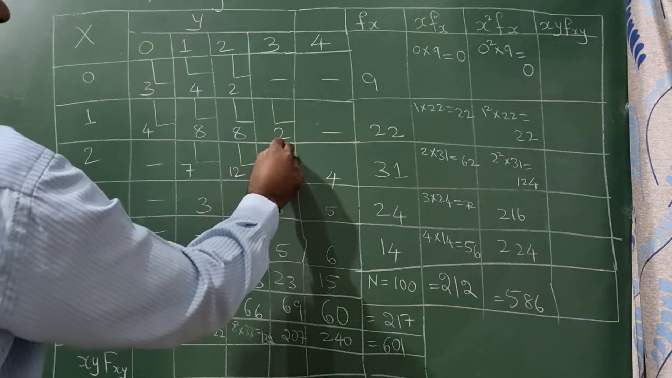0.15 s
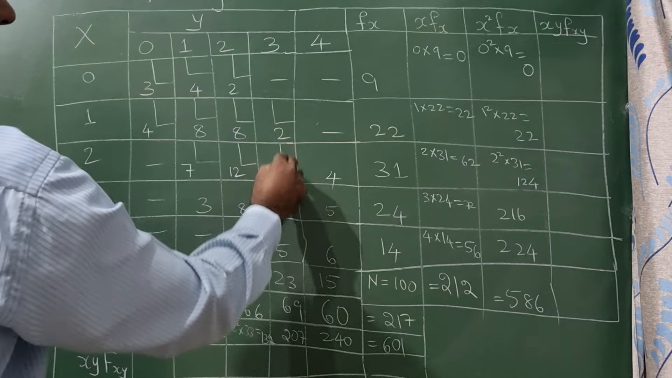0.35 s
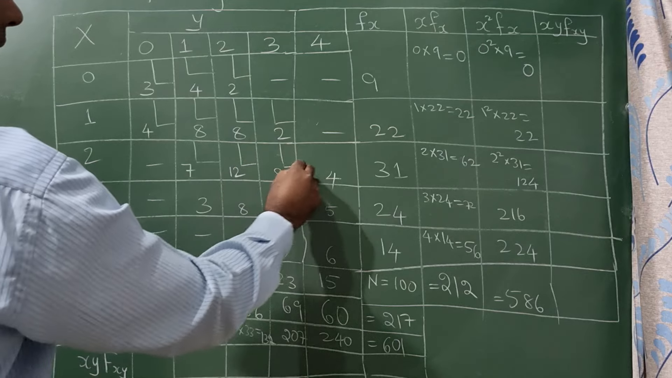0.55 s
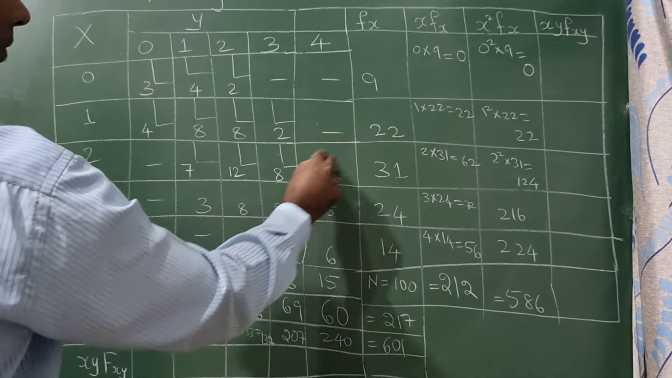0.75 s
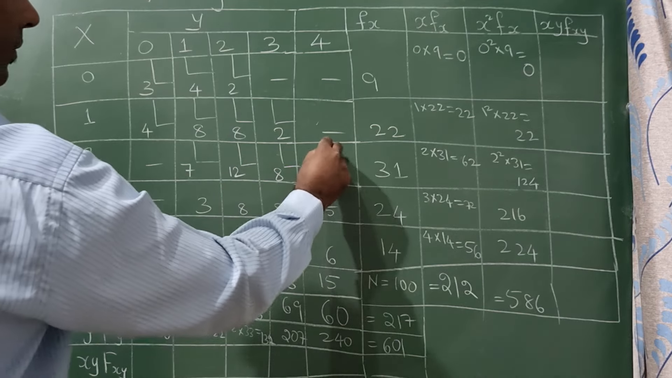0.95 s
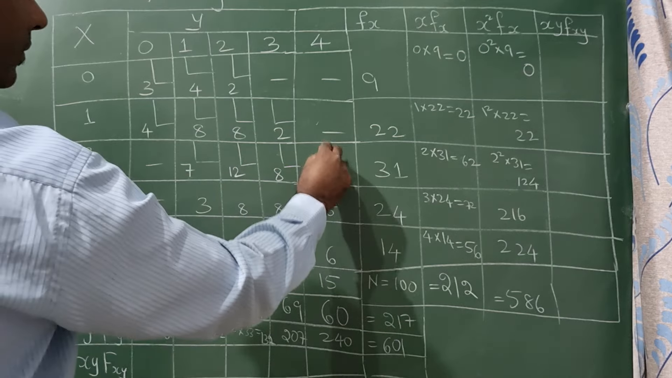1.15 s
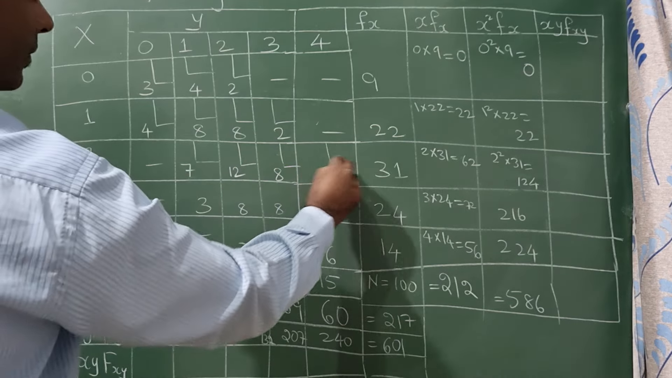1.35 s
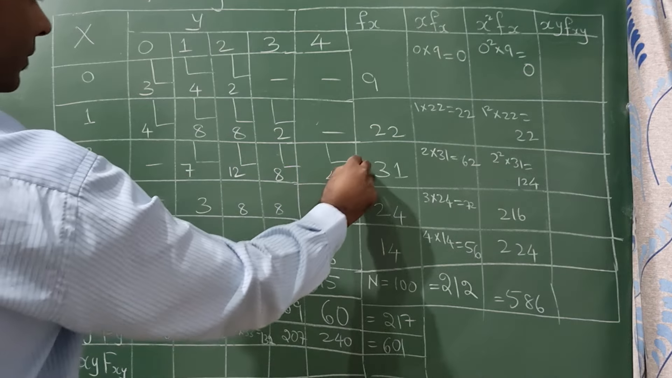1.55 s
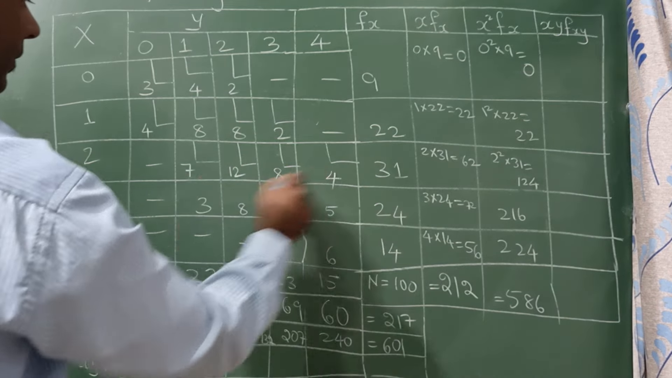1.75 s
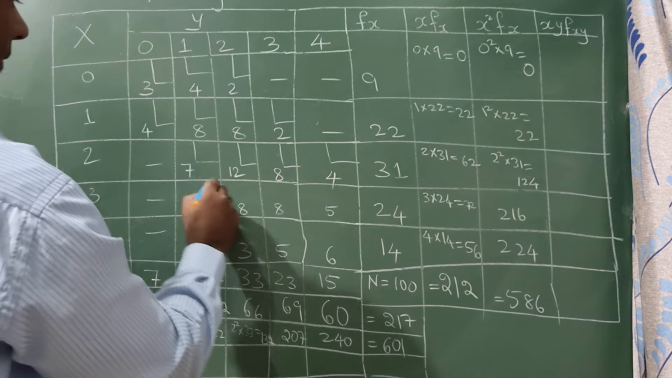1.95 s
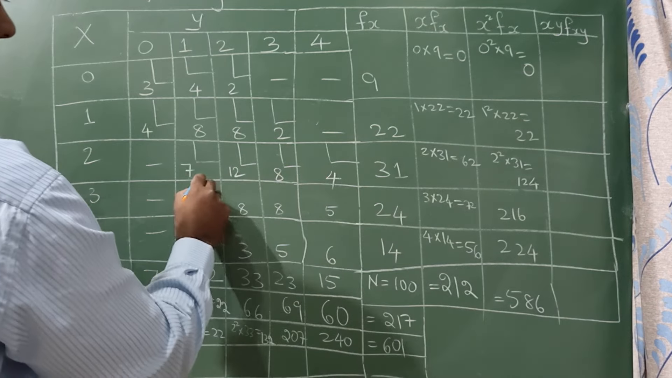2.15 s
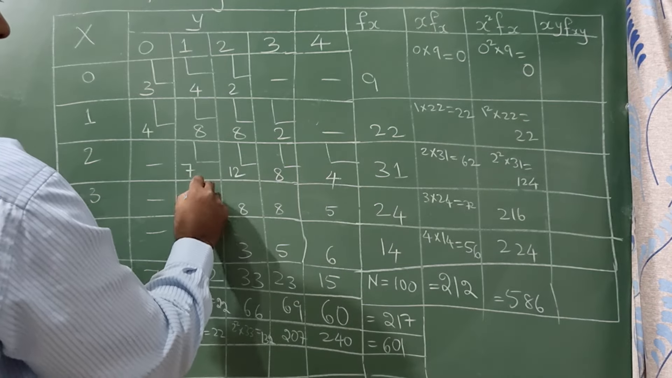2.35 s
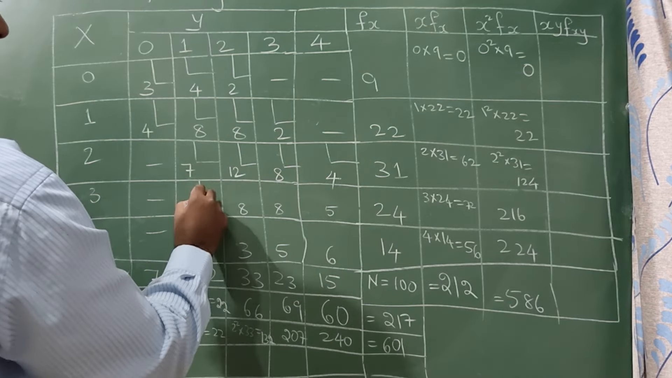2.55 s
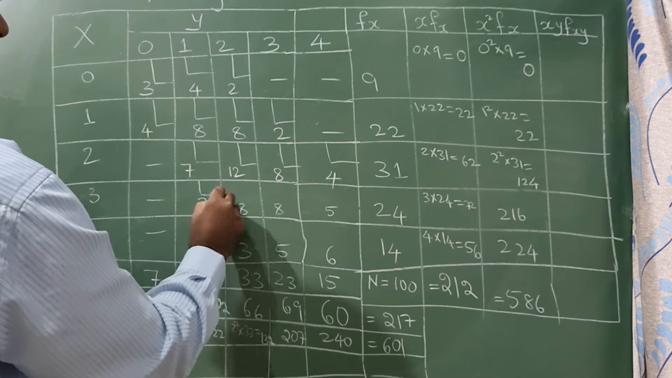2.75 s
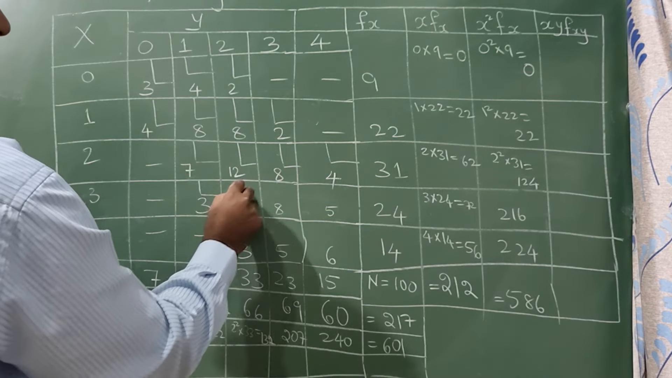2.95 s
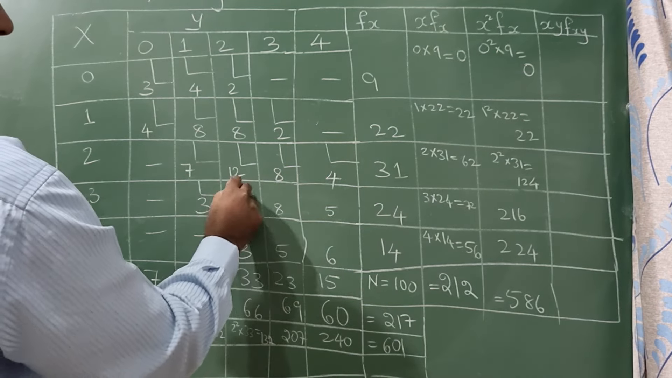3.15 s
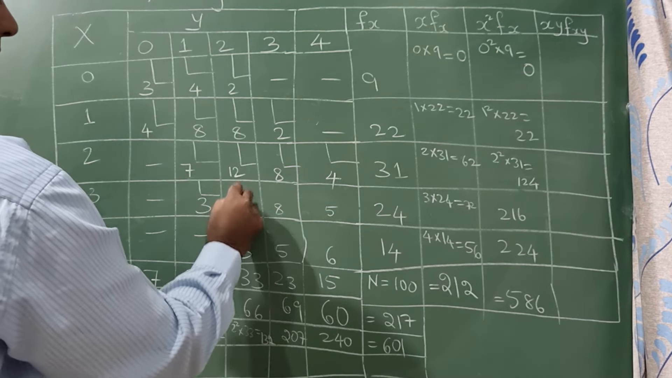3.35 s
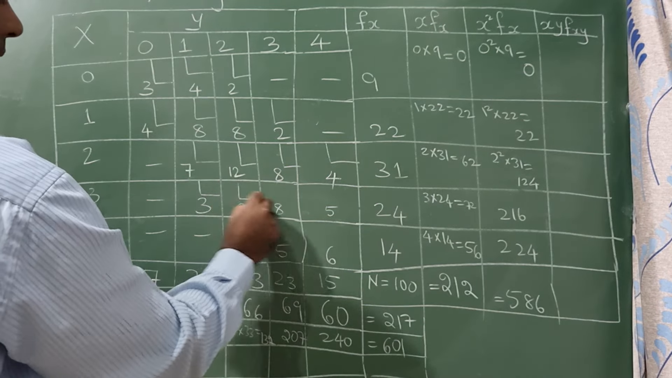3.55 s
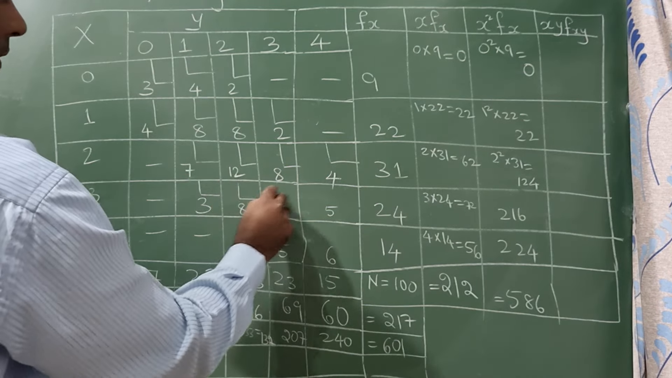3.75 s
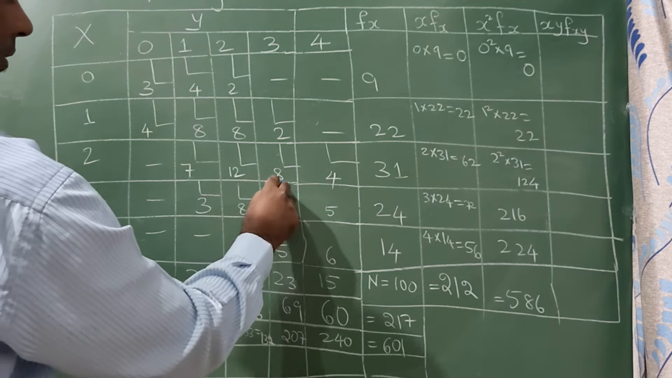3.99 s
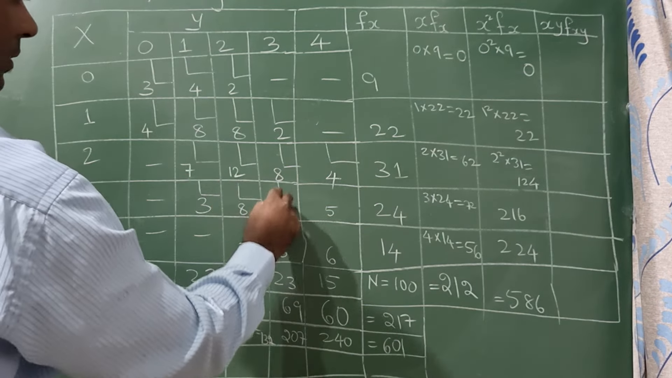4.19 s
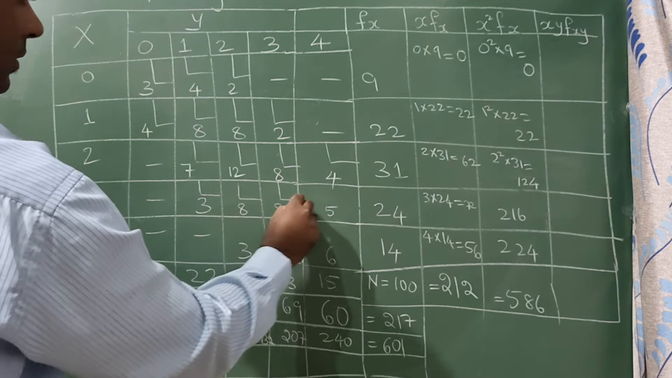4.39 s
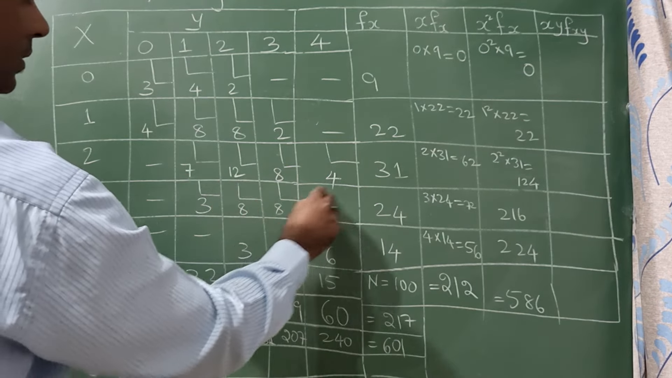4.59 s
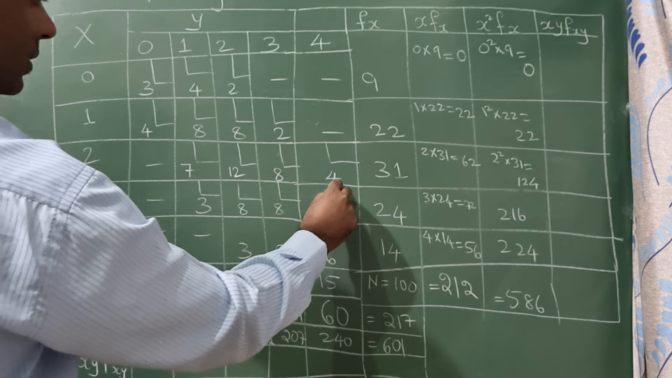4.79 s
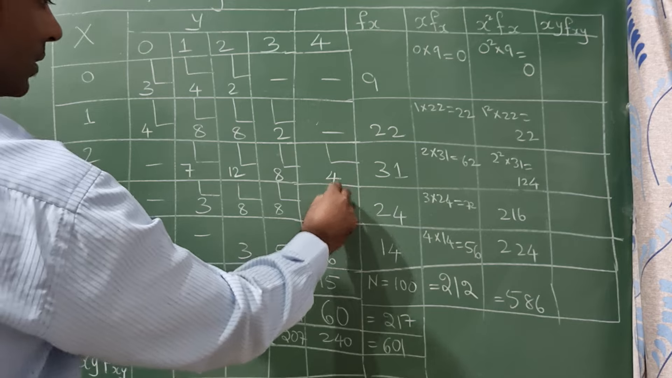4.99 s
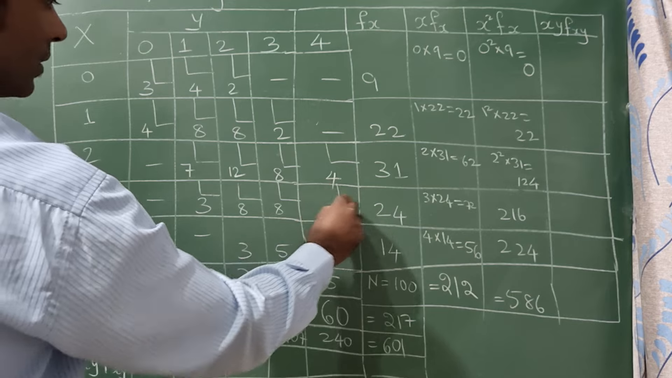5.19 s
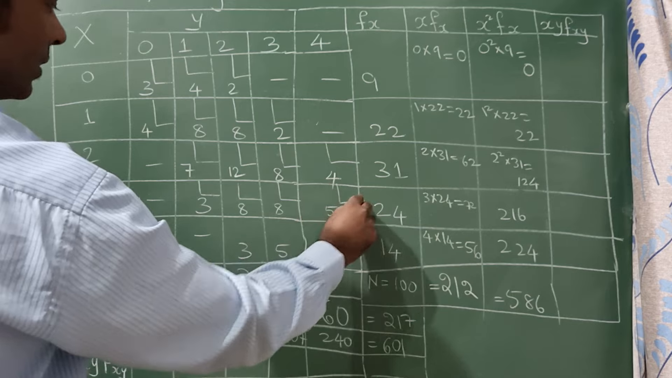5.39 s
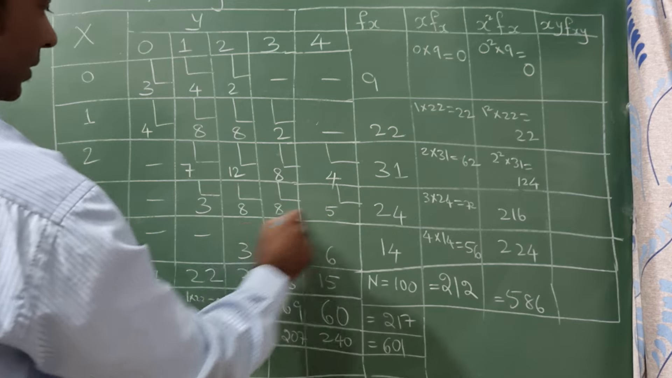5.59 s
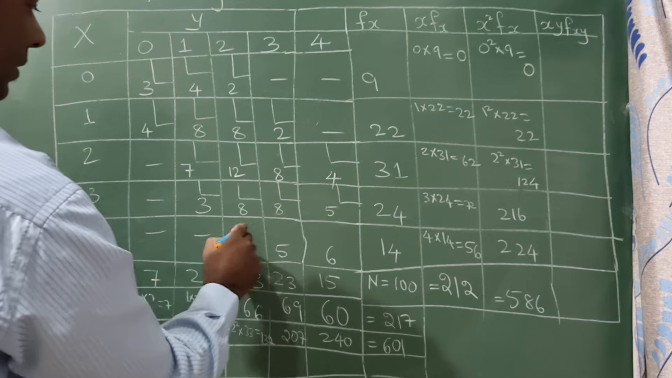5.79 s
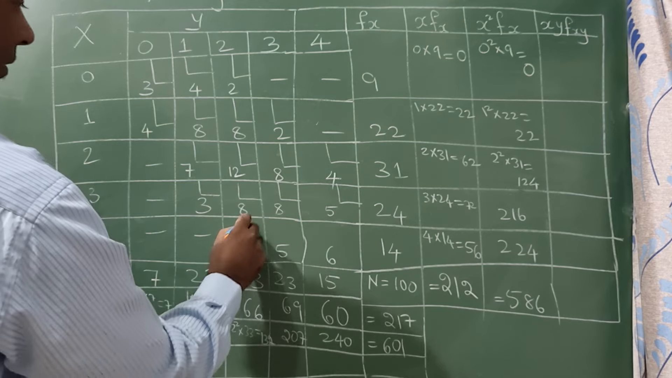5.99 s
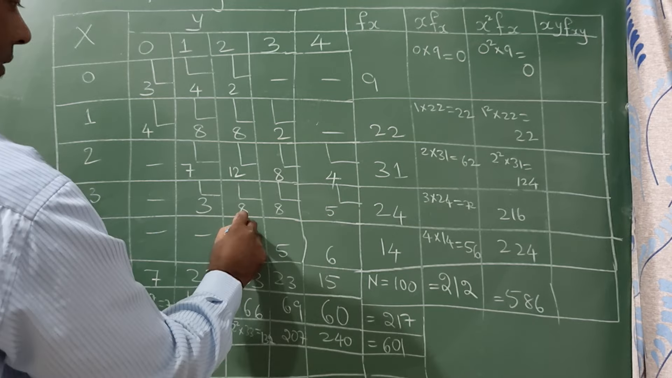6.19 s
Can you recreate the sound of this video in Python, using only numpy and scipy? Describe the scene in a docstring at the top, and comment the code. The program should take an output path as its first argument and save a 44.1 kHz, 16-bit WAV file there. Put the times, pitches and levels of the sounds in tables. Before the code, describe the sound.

A stick of chalk lands on a wall-mounted board six times, roughly once a second, each with a hollow, woody knock and a short room tail. After every knock come two brief dry strokes, the second raspier. A sleeve brushes faintly between marks as the arm moves. A distant clock ticks weakly above steady low hum and soft microphone hiss. The microphone stands in the same small, hard room.

```python
"""A small hard room with a wall-mounted board: chalk lands six times with a hollow knock,
each time followed by a down stroke and a side stroke. Knocks are fading tones of the board plus noise
for the room; strokes are filtered noise that swells as the chalk moves, with rasps, whistles and clicks.
A sleeve brushes, a far clock ticks, and steady room hum and microphone hiss lie below."""
import sys
import numpy as np
from scipy import signal
from scipy.fft import rfft, irfft, next_fast_len
from scipy.io import wavfile
from scipy.ndimage import map_coordinates

SR = 44100
rng = np.random.default_rng(int(sys.argv[2]) if len(sys.argv) > 2 else 0)


def boost(x):
    """Linear amplitude factor 10**(x/20) for a level x in decibels (scalar or array-like)."""
    u = np.asarray(x, float) / 20
    return 10 ** u


def put_to_file(sound):
    """Save the sound as 16-bit audio at rate SR, in the file named by the first command-line argument."""
    columns = np.atleast_2d(sound).T  # one column per channel
    safe = np.clip(columns, -1, 1)
    whole_steps = np.round(safe * 32767)
    wavfile.write(sys.argv[1], SR, whole_steps.astype(np.int16))


N = 274743  # length in samples

# colour of room hum and hiss: (frequency [Hz], relative level [dB])
AIR_COLOUR = [(15, -54), (25, -23.5), (38, -10), (59, -0.5), (123, -5), (190, -8), (270, -14.5), (354, -16),
              (575, -17.5), (641, -13.5), (714, -20), (1040, -22), (2000, -29), (14000, -33.5),
              (16000, -36)]
AIR_DB = -48.5  # usual level of hum and hiss together
HUM_WAVER_DB, HUM_WAVERS_PER_S = 0.7, 2.4  # full size at the lowest pitches only

# colour of the clock's tick: (frequency [Hz], relative level [dB])
CLOCK_COLOUR = [(500, -16), (1000, 4), (1800, -2.5), (2700, -1), (4500, -3), (6000, -13), (10000, -35)]
CLOCK_FIRST_S, CLOCK_PERIOD_S = 0.075, 1.0005
CLOCK_DB, CLOCK_WEAK_DB = -50.5, -6  # every other tick is weaker
CLOCK_T60_S, CLOCK_RISE_S = 0.63, 0.0053  # T60: the time to fall by 60 dB

# chalk landings: (time [s], level [dB], tick level against the knock before a shared lift [dB])
LANDINGS = [(0.284, -3, -39), (1.154, -10.5, -23.5), (2.381, -3.5, -41), (3.286, -5, -41),
            (4.13, -2.5, -34), (4.99, -8, -40.5)]
# pitches at which the board rings: (frequency [Hz])
BOARD_HZ = [178, 240, 281, 330, 376, 488, 540, 645, 672, 765, 812, 856, 922, 995, 1110, 1250, 1335, 1410,
            1515, 1620, 1790, 1845, 1945]
# how each pitch rings before a landing colours and shortens it: (level [dB], T60 [s])
BOARD_RING = [(8.5, 0.11), (-13.5, 0.87), (-5, 0.25), (9, 0.3), (5.5, 0.38), (-1, 0.14), (-6.5, 0.4),
              (-4, 0.19), (-4, 0.48), (-14.5, .3), (1.5, 0.49), (-3.5, 0.14), (11, 0.37), (-0.5, 0.45),
              (-8, 0.16), (-5, 0.2), (-13, 0.12), (-6, 0.5), (10.5, 0.26), (6.5, 0.24), (5, 0.41),
              (4, 0.17), (-9, 0.68)]
# colour of the knock at each landing spot, in order: (frequency [Hz], relative level [dB])
SPOT_1 = [(88, -53), (150, -23), (273, -8.5), (324, -27), (371, -0.5), (430, -15.5), (530, -3), (793, -0.5),
          (1480, -12.5), (1950, -20.5), (2200, -32.5), (2800, -35), (3640, -66), (6160, -120)]
SPOT_2 = [(88, -55), (150, -16.5), (230, -24), (358, -8), (425, -24), (536, 0), (813, -7), (989, -15.5),
          (1360, -7), (1900, -19.5), (2150, -32), (2800, -42), (3640, -68), (6160, -120)]
SPOT_3 = [(88, -40), (150, -16.5), (298, -19.5), (380, -5.5), (425, -5), (629, 0), (1040, -17.5),
          (1310, -9), (1600, -19), (2050, -24.5), (2300, -42), (2800, -42), (3640, -77), (6160, -120)]
SPOT_4 = [(88, -52), (150, -19), (305, -12.5), (380, -1), (425, -11), (480, -2), (784, -3.5), (1160, -15.5),
          (1500, -13.5), (1950, -25), (2200, -36), (2800, -36), (3640, -77), (6160, -120)]
SPOT_5 = [(88, -52), (150, -20.5), (277, -9.5), (313, -22), (376, 1.5), (425, -10), (474, -1.5), (719, -2),
          (900, -3), (1200, -10), (1950, -22), (2080, -33), (2800, -35), (3640, -68), (6160, -120)]
SPOT_6 = [(88, -40), (150, -6), (239, -26.5), (332, -11), (425, -9.5), (652, 0.5), (908, -1.5),
          (1650, -14.5), (2190, -33), (2800, -43), (3640, -73), (6160, -120)]
# the nearest wall sends a knock back: (delay [s], level [dB])
WALL_ECHOES = [(.0082, -11)]
# how the room's noise dies before a sound's own fade shortens it: (frequency [Hz], T60 [s])
ROOM_T60 = [(150, 1), (400, 0.57), (1000, 0.5), (2000, 0.48), (5000, 0.49), (14000, .2)]
# colour of the chalk tip on slate: (frequency [Hz], relative level [dB])
TIP_COLOUR = [(1500, -15), (2500, 3), (3600, 7), (4500, -3.5), (7000, -12.5), (15000, -16)]
CLICK_HZ = 4280  # the stick's own click as it lands

# strokes: (fastest moment [s], length [s], fine hiss level [dB], coarse hiss level [dB])
STROKES = [(.42, 0.15, -50.5, -50), (.63, 0.11, -51, -49.5), (1.3, 0.13, -51, -49.5),
           (1.52, .13, -44, -44.5), (2.52, 0.28, -53, -56.5), (2.79, 0.16, -51, -56.5),
           (3.45, 0.17, -50, -54.5), (3.64, .13, -48, -51), (4.26, .17, -50.5, -50.5),
           (4.455, 0.11, -49, -52.5), (5.13, 0.21, -53.5, -54), (5.335, .11, -46.5, -47.5)]
# sleeve brushes as the arm swings back: (middle [s], length [s], fine hiss level [dB], coarse hiss level [dB])
SLEEVE_SWINGS = [(1.864, 0.67, -56.5, -57), (3.0, 0.11, -59, -60), (3.89, 0.26, -62, -60),
                 (4.703, .2, -65, -67), (5.713, 0.61, -58, -57.5)]
STROKE_SHARPNESS, STROKE_TAIL = 1.37, 0.98  # how pointed the swell is; fall time over rise time
# colour of the fine hiss: (frequency [Hz], relative level [dB])
FINE_COLOUR = [(4710, -35), (8000, -10.5), (9690, -7), (11100, -4.5), (13000, -2.5), (14100, -0.5),
               (16000, -8)]
# colour of the coarse hiss: (frequency [Hz], relative level [dB])
COARSE_COLOUR = [(2000, 3), (2800, 1.5), (4000, 2), (5000, 0.5), (6300, 2.5), (8000, -7), (10000, -16.5)]

# the rubbed stick sings: (middle [s], length [s], centre [Hz], half width [Hz], level [dB])
WHISTLES = [(.41, 0.12, 5970, 400, -61), (0.618, .06, 11300, 400, -56), (0.639, 0.036, 1700, 80, -46.5),
            (1.3, 0.13, 6500, 500, -56), (0.397, .07, 3680, 200, -57), (1.19, 0.064, 3000, 600, -57),
            (1.287, 0.072, 4020, 250, -54.5), (1.52, 0.047, 1304, 60, -38.5), (1.52, 0.045, 1850, 70, -39),
            (1.517, .08, 14400, 600, -54), (1.516, .08, 6500, 500, -57), (2.52, .12, 12040, 250, -58.5),
            (2.777, 0.11, 14200, 600, -49), (3.449, 0.06, 11300, 600, -49),
            (3.648, 0.089, 11150, 250, -50.5), (4.266, 0.12, 11900, 500, -55),
            (4.449, 0.076, 11400, 450, -49), (4.483, 0.038, 1300, 250, -43), (5.13, 0.077, 6250, 300, -61),
            (5.325, 0.078, 1195, 100, -41), (5.346, .06, 11100, 400, -53)]

# side strokes dragging: (time of full pressure [s], rise [s], rasp level [dB], centre [Hz])
DRAGS = [(.625, .05, -42, 1040), (1.53, 0.073, -43.5, 1370), (2.77, 0.053, -47.5, 960),
         (3.635, 0.036, -41, 1000), (4.46, 0.041, -39, 1030), (5.335, 0.039, -37.5, 1160)]
DRAG_T60_S, DRAG_SHARPNESS = 0.47, 1.66  # the rasp dies with the board; how pointed its rise is

# the chalk catches and snaps free: (time [s], level [dB])
SLIPS = [(1.546, -16.5)]
# tones heard at a slip: (frequency [Hz], level [dB], T60 [s])
SLIP_RING = [(923, -21, 0.21), (1340, -11, 0.21), (1793, 4.5, 0.058), (2300, -9, 0.091), (2600, -22, 0.12)]
# crumbs cracking off: (time [s], level [dB], pitch [Hz])
CRUMBS = [(3.8607, -31.5, 9950), (5.551, -36, 13400)]

TOP_HZ = 15830  # nothing above this is let through


def unit(x):
    """Scales a sound to an average (rms) size of 1."""
    return x / np.sqrt(np.mean(x ** 2) + 1e-20)


def along(points, hz):
    """Reads a value between (Hz, value) points, with frequency on a log axis."""
    f, v = np.transpose(points)
    return np.interp(np.log(hz + 1), np.log(f + 1), v)


def wobble(rate):
    """Draws a smooth random curve with this many knots a second."""
    knots = rng.standard_normal(int(N * rate / SR) + 4)
    return map_coordinates(knots, [np.arange(N) * rate / SR])


def shaped(x, gain):
    """Changes a sound's spectrum over time by gain(Hz, s)."""
    hz, t, z = signal.stft(x, SR, nperseg=512)
    return signal.istft(z * gain(hz[:, None], t), SR, nperseg=512)[1][:len(x)]


def coloured(x, spectrum):
    """Filters a sound through (Hz, dB) points and scales it to rms 1."""
    m = next_fast_len(len(x) + 8192)
    gain = boost(along(spectrum, np.fft.rfftfreq(m, 1 / SR)))
    return unit(irfft(rfft(x, m) * gain, m)[:len(x)])


def add(track, s, sound):
    """Mixes a sound in at time s."""
    track[round(s * SR):][:len(sound)] += sound


def air():
    """Room hum and microphone hiss are steady noise; the hum wavers more than the hiss."""
    hum_db = HUM_WAVER_DB * wobble(HUM_WAVERS_PER_S)

    def waver(hz, t):
        return boost(np.interp(t * SR, np.arange(N), hum_db) / (1 + (hz / 250) ** 2))

    steady = coloured(rng.standard_normal(N), AIR_COLOUR)
    return boost(AIR_DB + 0.73 * wobble(2.22)) * shaped(steady, waver)


def clock():
    """Faint ticks of a far wall clock are fading noise, heard almost only through the room."""
    out, t = np.zeros(N + 2 * SR), np.arange(SR // 2) / SR
    blur = boost(-60 * t / CLOCK_T60_S) * (1 - np.exp(-t / CLOCK_RISE_S))
    for k in range(7):
        tick = coloured(rng.standard_normal(len(t)), CLOCK_COLOUR) * blur
        level_db = CLOCK_DB + CLOCK_WEAK_DB * (k % 2)
        add(out, CLOCK_FIRST_S + k * CLOCK_PERIOD_S, boost(level_db) * tick)
    return out[:N]


def board():
    """Joins the board's pitches and their ringing into (Hz, dB, T60 s) rows."""
    return np.column_stack([BOARD_HZ, BOARD_RING])


def ringing(modes, t, tilt_db, spread_db):
    """Fading tones, all pushed the same way, each at a new strength; the contact takes a moment."""
    hz, db, t60 = np.transpose(modes)[:, :, None]
    new_db = spread_db * rng.standard_normal(hz.shape)
    level = boost(db + tilt_db(hz) + new_db - 60 * t / t60)
    ring = np.sum(level * np.sin(2 * np.pi * hz * t), axis=0)
    return -ring * (1 - np.exp(-(t / 0.00039) ** 2))


def combed(x, width_hz, lift_db):
    """Makes noise lean on the pitches at which the board rings."""
    m = next_fast_len(len(x) + 8192)
    hz = np.fft.rfftfreq(m, 1 / SR)
    peaks = sum(1 / (1 + ((hz - mode_hz) / width_hz) ** 2) for mode_hz in BOARD_HZ)
    return unit(irfft(rfft(x, m) * (1 + boost(lift_db) * peaks), m)[:len(x)])


def diffuse(noise, t):
    """The room's answer: noise dying band by band, building up over the first reflections."""
    tail = shaped(noise, lambda hz, s: boost(-60 * s / along(ROOM_T60, hz)))
    return tail * (1 - np.exp(-(t / 0.0012) ** 2))


def tip_tick(t):
    """The hard chalk tip ticks: a sharp hiss, a fading tone and a duller clack."""
    tip = coloured(rng.standard_normal(len(t)), TIP_COLOUR)
    needle = coloured(rng.standard_normal(len(t)),
                      [(2000, -15), (3200, 5.0), (6500, -5), (8500, -16), (15000, -7)])
    hiss = needle * boost(-60 * t / 0.0088)
    click = boost(4 - 60 * t / 0.0033) * np.sin(2 * np.pi * CLICK_HZ * t)
    clack = tip * (boost(-6.5 - 60 * t / 0.036) + boost(-16 - 60 * t / 0.5))  # quick fall, then slow
    return hiss + click + clack


def taps():
    """Each landing rings the board and fills the room; the hard tip ticks and a wall echoes the knock."""
    out, t = np.zeros(N + SR), np.arange(SR // 2) / SR
    spots = [SPOT_1, SPOT_2, SPOT_3, SPOT_4, SPOT_5, SPOT_6]
    for (s, db, tick_db), colour in zip(LANDINGS, spots):
        noise = combed(coloured(rng.standard_normal(len(t)), colour), width_hz=6.7, lift_db=-3.5)
        ring = ringing(board(), t, lambda hz: along(colour, hz), spread_db=3.5)
        knock = boost(-9.0) * ring / np.abs(ring).max() + boost(-11.0) * diffuse(noise, t)
        knock *= 1 + 0.26 * np.exp(-t / 0.02)  # the first cycles stand out before the room takes over
        knock *= boost(-(t / 0.095) ** 2)  # the tail falls ever faster towards its end
        add(out, s, boost(db) * (knock + boost(tick_db + 7.5) * tip_tick(t)))
        for delay, echo_db in WALL_ECHOES:
            add(out, s + delay, boost(db + echo_db) * knock)
    return signal.sosfilt(signal.butter(4, 150, "highpass", fs=SR, output="sos"), out[:N])


def grit(spiky_db):
    """Dense friction grains: noise whose size jumps from grain to grain."""
    return rng.standard_normal(N) * boost(spiky_db * wobble(400))


def swells(rows):
    """Fine and coarse hiss levels follow the speed as it rises, peaks and falls."""
    s, length, *dbs = np.transpose(rows)[:, :, None]
    late = np.arange(N) / SR - s
    side = np.where(late > 0, STROKE_TAIL, 1)
    shape = np.exp(-np.abs(2 * late / length / side) ** STROKE_SHARPNESS)
    return [np.sqrt(np.sum((boost(db) * shape) ** 2, axis=0)) for db in dbs]


def rubbing():
    """Dust shears off the tip as fine and coarse hiss; the sleeve whispers alike."""
    fine, coarse = swells(STROKES + SLEEVE_SWINGS)
    fine_hiss = fine * coloured(grit(spiky_db=2.0), FINE_COLOUR)
    coarse_hiss = coarse * coloured(grit(spiky_db=2.0), COARSE_COLOUR)
    return fine_hiss + coarse_hiss


def whistles():
    """The rubbed stick sings: friction noise swells briefly inside one narrow band."""
    out = np.zeros(N + SR)
    hz = np.fft.rfftfreq(SR // 2, 1 / SR)
    t = np.arange(SR // 2) / SR - 1 / 4  # zero at the middle of the whistle
    for s, length, centre_hz, width_hz, db in WHISTLES:
        resonance = 1 / (1 + ((hz - centre_hz) / width_hz) ** 2)
        band = unit(irfft(rfft(rng.standard_normal(SR // 2)) * resonance))
        add(out, s - 1 / 4, boost(db) * band * np.exp(-(2 * t / length) ** 2))
    return out[:N]


def drags():
    """Stick-slip grains, as the chalk grips and lets go, shake the board around a centre pitch."""
    out = np.zeros(N)
    for s, rise, db, centre_hz in DRAGS:
        def bump(hz, t):
            octaves = np.log2((hz + 1) / centre_hz)
            return 0.34 + 1 / (1 + (octaves / 0.66) ** 2) + 0 * t

        noise = coloured(grit(spiky_db=2.5),
                         [(150, -1), (400, 3.5), (2200, -7.5), (3200, -10.5), (9000, -40)])
        noise = unit(shaped(combed(noise, width_hz=3.2, lift_db=11.5), bump))
        late = np.arange(N) / SR - s
        press = np.exp(-(np.maximum(-late, 0) / rise) ** DRAG_SHARPNESS)
        out += noise * press * boost(db - 60 * np.maximum(late, 0) / DRAG_T60_S)
    return out


def slips():
    """A catch of the stick gives a bright short knock; single crumbs click as they crack off."""
    out, t = np.zeros(N + SR), np.arange(SR // 2) / SR
    for s, db in SLIPS:
        noise = coloured(rng.standard_normal(len(t)), [(600, -10.0), (1200, -5.5), (1850, 5.5),
                                                       (2500, -0.5), (3000, -17), (6000, -53)])
        snap = boost(-21 - 60 * t / 0.012) * rng.standard_normal(len(t))
        ring = boost(-2.0) * ringing(SLIP_RING, t, lambda hz: 0 * hz, spread_db=6)
        glow = boost(-14.0) * diffuse(noise, t) * boost(-(t / 0.048) ** 2)
        add(out, s, boost(db) * (snap + ring + glow))
    for s, db, hz in CRUMBS:
        hiss = coloured(rng.standard_normal(len(t)), [(6000, -30), (9000, -3), (16000, -4.0)])
        crack = np.sin(2 * np.pi * hz * t) + 0.89 * hiss
        add(out, s, boost(db - 5.5 - 60 * t / 0.014) * crack)
    return out[:N]


def scene():
    """Mixes all layers for one microphone position: both channels nearly alike."""
    room = air()
    near = clock() + taps() + rubbing() + whistles() + drags() + slips()
    mid = near + room
    side = (boost(-37.5) * near + boost(-30) * room) * wobble(300)  # a faint flickering difference
    return np.array([mid + side, mid - side])


def band_limit(x):
    """A steep low-pass at the top of the band."""
    return signal.sosfilt(signal.butter(12, 16440, fs=SR, output="sos"), x)


def record(dry):
    """Rolls off the deep bass and cuts the highest treble."""
    m = next_fast_len(N + 8192)
    hz = np.fft.rfftfreq(m, 1 / SR)
    bass_roll_off = 1 / np.sqrt(1 + (38 / (hz + 1)) ** 8)
    passed = irfft(rfft(dry, m) * (hz < TOP_HZ) * bass_roll_off, m)[:, :N]
    return band_limit(passed)


dry = scene()
out = record(dry)
put_to_file(out)
```